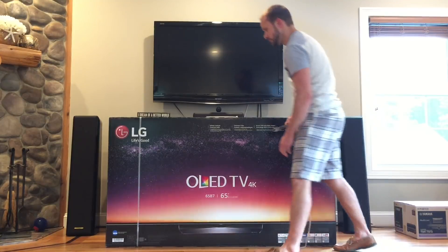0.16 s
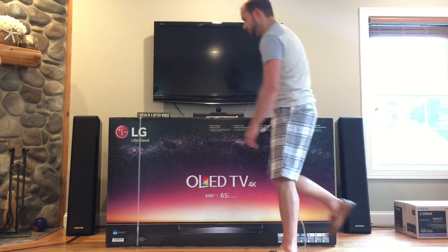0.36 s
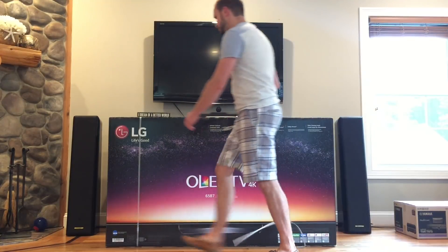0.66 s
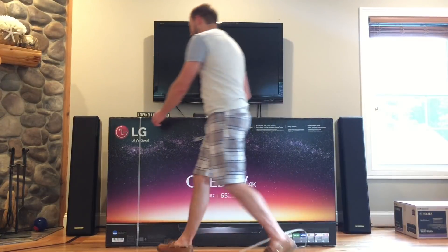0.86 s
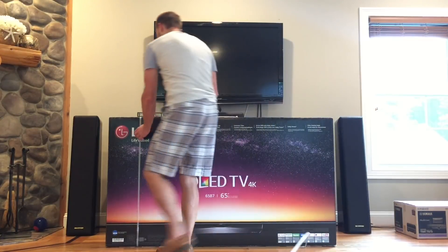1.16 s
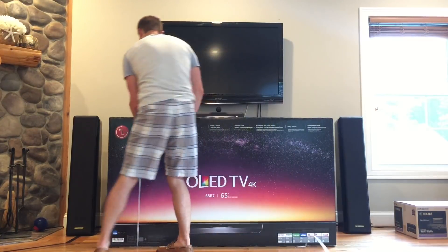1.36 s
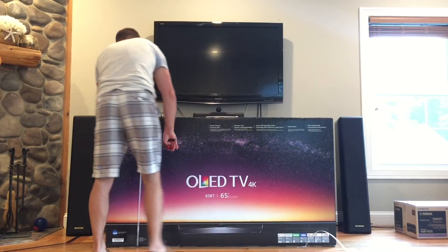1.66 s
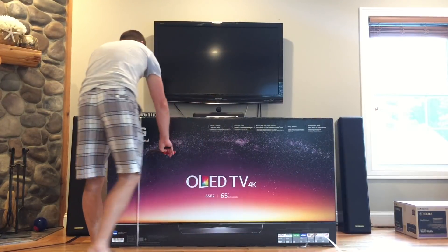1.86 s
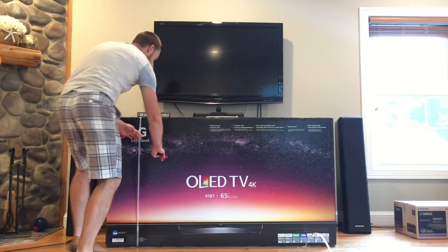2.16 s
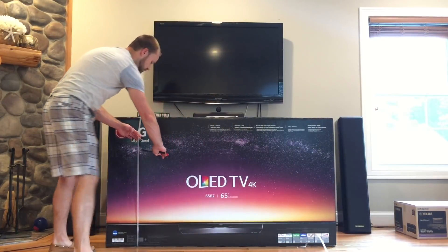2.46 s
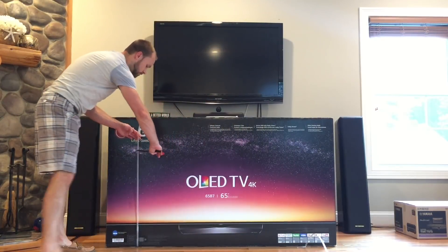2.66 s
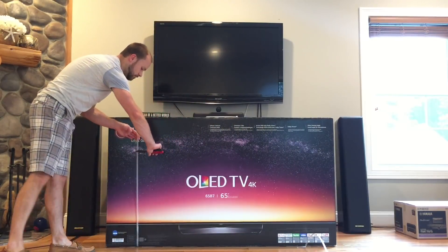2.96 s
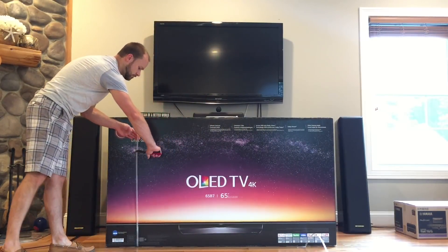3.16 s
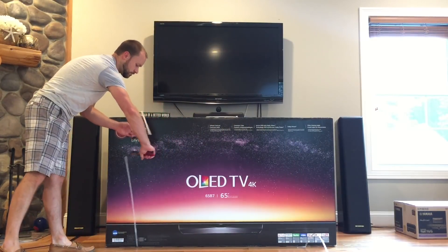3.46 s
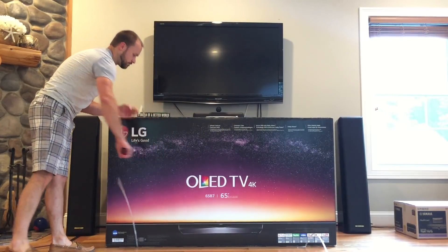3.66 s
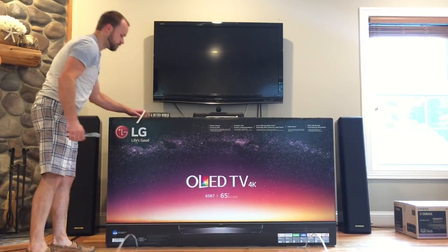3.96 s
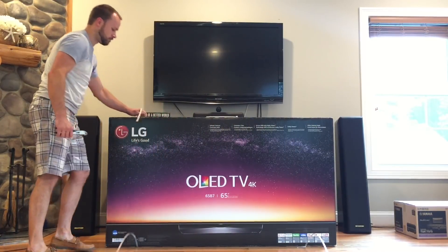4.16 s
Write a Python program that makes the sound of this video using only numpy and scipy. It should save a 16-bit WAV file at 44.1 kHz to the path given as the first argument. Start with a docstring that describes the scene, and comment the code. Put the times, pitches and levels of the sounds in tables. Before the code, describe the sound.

Someone shuffles around a cardboard box indoors, then cuts its plastic packing strap with small ticks and one sharp, thumping crack.

```python
"""Cutting the strap on a cardboard box

A living room with a wooden floor, the microphone close to a large box. Over quiet room tone a man
shuffles round it: soles thud, scuff and squeak, hands brush the cardboard, joists rumble under him.
Blades bite the plastic strap in small ticks; it snaps and slaps the box, and the room rings on."""
import sys
import numpy as np
from scipy import signal
from scipy.fft import rfft, irfft, next_fast_len
from scipy.io import wavfile
from scipy.ndimage import uniform_filter1d

SR = 44100
rng = np.random.default_rng(int(sys.argv[2]) if len(sys.argv) > 2 else 0)


def materialize(psi):
    """Save the field psi as 16-bit PCM at rate SR to the path in sys.argv[1].

    A 1-D psi becomes a single channel; in a 2-D psi each row is a channel.
    """
    bounded = np.clip(np.atleast_2d(psi).T, -1, 1)
    quanta = np.round(bounded * 32767).astype(np.int16)
    wavfile.write(sys.argv[1], SR, quanta)


N = 189982
TIME = np.arange(N) / SR


def amp(db):
    """dB to gain."""
    return 10 ** (np.asarray(db) / 20)


def unit(x):
    """Scaled to rms 1."""
    return x / np.sqrt(np.mean(x ** 2) + 1e-20)


def add(out, start_s, x):
    """Mixes x into out from start_s."""
    part = out[round(start_s * SR):][:len(x)]
    part += x[:len(part)]


def along(points, hz):
    """Interpolates (freq_hz, value) points on a log frequency axis."""
    freqs, values = np.transpose(points)
    return np.interp(np.log(hz + 1), np.log(freqs + 1), values)


def colour(spectrum):
    """Zero-phase response through (freq_hz, gain_db) points."""
    return lambda hz: amp(along(spectrum, hz))


def causal(spectrum):
    """Response through (freq_hz, gain_db) points that starts at once: minimum phase."""
    def response(hz):
        cepstrum = irfft(np.log(colour(spectrum)(hz)))
        half = len(cepstrum) // 2
        fold = np.r_[1, 2 * np.ones(half - 1), np.zeros(half)]
        return np.exp(rfft(cepstrum * fold))
    return response


def modes(table):
    """Causal response of (pitch_hz, width_hz, gain_db) resonances, alternating in sign."""
    return lambda f: sum((-1) ** k * amp(db) * 1j * f * width / (hz * hz - f * f + 1j * f * width)
                         for k, (hz, width, db) in enumerate(table))


def filtered(x, response):
    """x through a complex frequency response."""
    size = next_fast_len(x.shape[-1] + SR // 2)
    hz = np.fft.rfftfreq(size, 1 / SR)
    return irfft(rfft(x, size) * response(hz), size)[..., :x.shape[-1]]


def noise(response, patchy_db=0, grain_db=0):
    """Filtered noise of rms 1, with patches of random gain and fast grit."""
    spectra = signal.stft(rng.standard_normal(N + SR), nperseg=512)[2]
    patches = uniform_filter1d(rng.standard_normal(spectra.shape), 3, axis=0)
    patches = unit(uniform_filter1d(patches, 10, axis=1))
    patchy = signal.istft(spectra * amp(patchy_db * patches), nperseg=512)[1][:N]
    grit = unit(uniform_filter1d(rng.standard_normal(N), 60))
    return unit(filtered(patchy * amp(grain_db * grit), response))


# the quiet living room, all round the microphone: freq_hz, gain_db
TONE_SPECTRUM = [(15, -44), (25, -8), (124, 3), (330, -4), (496, -13), (669, -11), (831, -12.5),
                 (2330, -16), (9330, -24.5), (10400, -28), (13600, -27.5), (15200, -35), (16500, -51)]


def room_tone(level_db=-66.5):
    """Steady low noise under everything."""
    return amp(level_db) * noise(colour(TONE_SPECTRUM), patchy_db=1.0)


# joists under the floor: freq_hz, gain_db
JOIST_SPECTRUM = [(20, -28), (35, -8), (60, 5.5), (100, 0.5), (160, -43)]
# their rumble as he moves about: time_s, level_db
WEIGHT_SHIFTS = [(0, -84), (0.17, -76), (0.32, -60), (0.6, -74), (0.97, -65), (1.68, -69), (1.93, -89),
                 (2.29, -77), (2.44, -55), (2.63, -75), (2.77, -67), (2.89, -99), (2.99, -60.5), (3.3, -76),
                 (3.98, -81.5), (4.08, -56), (4.14, -56), (4.31, -91.5)]


def joist_rumble():
    """The joists rumble as his weight shifts."""
    weight = amp(np.interp(TIME, *np.transpose(WEIGHT_SHIFTS)))
    return weight * noise(colour(JOIST_SPECTRUM), patchy_db=1.2)


# soles, hands and loose strap, close by: start_s, rise_s, rasp_db, t60_s, body_re_db, sizzle_re_db
SCUFF_STROKES = [(0.12, 0.0014, -56.5, 0.36, -5, -4), (0.242, 0.0082, -61, 0.35, -5, -21),
                 (0.252, 0.087, -47, 0.43, -7.5, -39), (0.401, 0.017, -54.5, 0.17, 0.5, -6),
                 (.534, 0.0077, -57.5, 0.12, -10, -21), (.54, 0.062, -60.5, 0.068, 7, -31),
                 (0.614, 0.029, -49, 0.35, 3, -21), (.88, 0.037, -67.5, 0.26, 4, -10),
                 (1.006, .001, -56.5, 0.27, 4, -34), (1.041, 0.043, -63.5, 0.44, -12, -4.5),
                 (1.202, 0.001, -75.5, 0.21, 21.5, -7), (1.25, 0.016, -69, 1, 7, -1),
                 (1.38, 0.0079, -55, 0.31, 15.5, -3), (1.47, .002, -59.5, 0.14, 9, -19),
                 (1.561, 0.03, -56.5, 0.41, 4, -9), (1.592, 0.0012, -50.5, 0.29, 5.5, 1.5),
                 (2.029, .02, -69.5, 0.18, 6.5, -18), (2.15, 0.0098, -69, 0.76, 2.5, -7),
                 (2.351, 0.0011, -49.5, 0.03, -20, -11), (2.354, 0.0096, -54.5, 0.37, 4, -35),
                 (2.431, 0.0029, -56, 0.24, 11, -35), (2.657, .012, -66, 0.26, 8, -24),
                 (2.727, 0.0015, -61, .12, 2.5, -11), (2.74, 0.0081, -76, 0.54, 12, -12),
                 (2.856, 0.0049, -72.5, 0.13, -2, -14), (2.937, 0.0014, -64.5, 0.15, 1.5, -7),
                 (2.961, 0.013, -74.5, 0.2, 11.5, -11), (3.936, .008, -64, 0.31, 10.5, -25),
                 (4.073, .005, -64.5, 0.26, 5, -17), (4.1, 0.0086, -63.5, 0.15, 0, -6),
                 (4.16, 0.052, -74.5, 0.18, 3, -2)]
# hollow cardboard: pitch_hz, width_hz, gain_db
BODY_MODES = [(460, 200, -3), (680, 175, 0), (1020, 200, -2), (1184, 220, -4.5), (1555, 230, -8)]
# rasp of the rubbed surfaces: pitch_hz, width_hz, gain_db
RASP_MODES = [(1280, 250, -2), (2090, 300, 3), (2500, 540, 1.5), (3540, 970, -1.5), (4415, 1100, -3),
              (5870, 3100, -9), (7180, 700, -14)]
# fine hiss on top: freq_hz, gain_db
SIZZLE_SPECTRUM = [(5000, -20), (7500, -0.5), (10500, -5), (13000, -7), (15500, -6)]


def scuffs(swell_db=10, linger=1.07):
    """Rubbing swells and dies away: a rasp, with hollow body and sizzle set relative to it."""
    power, t = np.zeros((3, N)), np.arange(SR // 2) / SR
    for start_s, rise_s, rasp_db, t60_s, body_re_db, sizzle_re_db in SCUFF_STROKES:
        fall_db = -60 * (np.abs(t - rise_s) / t60_s) ** linger  # linger over 1 holds the peak
        shape_db = np.where(t < rise_s, swell_db * (t / rise_s - 1), fall_db)
        for layer, offset_db in zip(power, (body_re_db, 0, sizzle_re_db)):
            add(layer, start_s, amp(rasp_db + offset_db + shape_db) ** 2)
    body = noise(modes(BODY_MODES), patchy_db=5.4, grain_db=1.4)
    rasp = noise(modes(RASP_MODES), patchy_db=3.5, grain_db=1.4)
    sizzle = noise(colour(SIZZLE_SPECTRUM), patchy_db=0.37, grain_db=2.2)
    return np.sum(np.sqrt(power) * [body, rasp, sizzle], axis=0)


# the living room's ring, behind the close sounds: freq_hz, t60_s
ROOM_DECAY = [(100, 0.4), (400, 0.48), (1200, 0.55), (3000, 0.43), (7000, 0.45), (12000, 0.34),
              (15000, 0.21), (16500, 0.14)]


def room_tail(x):
    """A diffuse tail in which each frequency dies at its own speed."""
    hz, t, spectra = signal.stft(rng.standard_normal(SR), SR, nperseg=256)
    decay = amp(-60 * t / along(ROOM_DECAY, hz)[:, None])
    tail = signal.istft(spectra * decay, SR, nperseg=256)[1]
    onset = 1 - np.exp(-np.arange(len(tail)) / SR / 0.001)
    return signal.fftconvolve(x, tail / np.linalg.norm(tail) * onset)[:N]


# footfalls and bumps near the microphone: start_s, push_db, pitch_hz, rumble_re_db, knock_re_db
FOOTFALLS = [(0.14, -40, 169, -3.5, 7), (0.209, -46.5, 230, -21, 9.5), (0.328, -35.5, 257, -16, -17),
             (0.447, -43.5, 154.5, -5.5, -1.5), (0.615, -33.5, 458, -12.5, -6),
             (0.685, -44, 145, -4.5, 17.5), (0.88, -43.5, 248, -1, 4), (1.007, -35.5, 214, -3.5, 1.5),
             (1.204, -40.5, 145, 4, 16), (1.266, -50.5, 257, -1, -20), (1.318, -45.5, 333, -4.5, 4),
             (1.382, -37.5, 212, 8.5, 14), (1.391, -29, 259, -8.5, 1), (1.416, -26.5, 445, -13.5, -10),
             (1.449, -32.5, 460, -18, -5), (1.492, -38.5, 420, -3.5, -1), (1.57, -38.5, 193, 2, 7),
             (1.6, -45, 247, 3, 9), (2.162, -46.5, 333, -9.5, 8), (2.362, -40.5, 273, 3.5, 12),
             (2.431, -34, 243, -6.5, -17), (2.567, -39, 190, -4.5, 7.5), (2.668, -39, 263, -7.5, 8),
             (3.021, -35.5, 196, -3.5, -18), (3.143, -34, 170, -3, 4), (3.94, -45.5, 238.5, -1.5, -14),
             (4.076, -40, 160, -6, -5.5), (4.094, -41.5, 144, 4, -10)]
# floorboards: pitch_hz, width_hz, gain_db
FLOOR_MODES = [(320, 110, 6.5), (433, 250, -1.5), (705, 99, -2.5), (1000, 340, -11), (1460, 340, -15)]


def thuds(rumble_rise_s=0.029, rumble_hold_s=0.054, rumble_t60_s=0.35, knock_t60_s=0.079):
    """A soft push of about two cycles; a wooden knock and a short rumble are set relative to it."""
    out, knocks, t = np.zeros(N), np.zeros(N), np.arange(SR // 4) / SR
    rise = 1 - np.exp(-(t / rumble_rise_s) ** 2)
    swell = rise * amp(-60 * t / rumble_t60_s) / (1 + (t / rumble_hold_s) ** 8)
    for start_s, push_db, hz, rumble_re_db, knock_re_db in FOOTFALLS:
        cycles = t * hz - 1.25  # the sole takes about a cycle to settle
        push = np.exp(-(cycles / 0.87) ** 2) * np.cos(2 * np.pi * cycles)
        boards = modes([(hz, 1.3 * hz, 0), (1.6 * hz, 1.3 * hz, -2)])
        rumble = unit(filtered(rng.standard_normal(len(t)), lambda f: boards(f) ** 2))
        knock = amp(-60 * t / knock_t60_s) * rng.standard_normal(len(t))
        add(out, start_s, amp(push_db) * (push + amp(rumble_re_db) * swell * rumble))
        add(knocks, start_s + 0.003, amp(push_db + knock_re_db) * knock)
    return out + filtered(knocks, lambda f: modes(FLOOR_MODES)(f) ** 2)


# small hard contacts, close by: start_s, level_db, pitch_hz, t60_s
CONTACTS = [(0.245, -55, 5740, 0.22), (0.581, -58.5, 5880, 0.065), (.583, -53, 1980, 0.2),
            (0.636, -51.5, 4650, 0.095), (1.008, -61, 3450, 0.026), (1.022, -61, 4300, 0.12),
            (1.191, -67, 4650, .2), (1.386, -41, 950, 0.29), (1.491, -51, 487, 0.44),
            (2.36, -45, 3370, 0.036), (2.433, -70, 3620, 0.025), (2.727, -57, 8800, 0.026),
            (2.861, -65, 4170, 0.036), (2.938, -60, 3710, 0.027), (3.934, -52, 2090, 0.066),
            (3.954, -53.5, 1503, 0.18), (4.108, -55, 5600, 0.052)]


def ticks(click_t60_s=0.0022):
    """Each contact clicks and leaves a rough ring: narrow noise dying away."""
    out, t = np.zeros(N), np.arange(SR // 5) / SR
    for start_s, level_db, hz, t60_s in CONTACTS:
        ring = unit(filtered(rng.standard_normal(len(t)), modes([(hz, 0.048 * hz, 0)])))
        click = amp(-60 * t / click_t60_s) * rng.standard_normal(len(t))
        add(out, start_s, amp(level_db) * (amp(-60 * t / t60_s) * ring + 0.57 * click))
    return out


def sole_squeak(start_s=0.534, length_s=0.043, pitch_hz=1975, level_db=-56):
    """A sole sticks and sings a short, slightly unsteady tone."""
    out, t = np.zeros(N), np.arange(round(length_s * SR)) / SR
    drift = 0.5 * unit(uniform_filter1d(rng.standard_normal(len(t)), size=300))
    arch = np.abs(np.sin(np.pi * t / length_s)) ** 0.3
    add(out, start_s, amp(level_db) * arch * np.sin(2 * np.pi * pitch_hz * t + drift))
    return out


def strap_bursts(rows, room_db):
    """Two tracks: noise bursts that swell and break off up close, and one click each for the room."""
    bursts, clicks = np.zeros((2, N))
    for time_s, level_db, length_s in rows:
        age = np.arange(SR // 50) / SR / length_s
        burst = age * np.exp(1 - age ** 2) * rng.standard_normal(len(age))
        add(bursts, time_s - length_s / 2, amp(level_db) * burst)
        clicks[round(time_s * SR)] = amp(level_db + room_db) * np.sqrt(length_s * SR)
    return np.array([bursts, clicks])


# blades biting the strap, close to the microphone: time_s, level_db, length_s
BLADE_BITES = [(3.2779, -41, 0.0006), (3.301, -48, 0.0014), (3.3265, -33, 0.0015), (3.3582, -31.5, 0.0014),
               (3.362, -34, .001), (3.3668, -23, 0.0022), (3.377, -30.5, 0.006)]
# a small tear is thinner than the snap: freq_hz, gain_db
BITE_SPECTRUM = [(1200, -7), (2600, -0.5), (5000, -3), (9000, -0.5), (14500, 6.5)]
# the loose end striking the box: time_s, level_db
STRAP_SLAPS = [(3.446, -13), (3.4507, -14)]
# a flat slap is duller than the snap: freq_hz, gain_db
SLAP_SPECTRUM = [(1500, 0.5), (3000, 1.5), (6000, -3.5), (15000, -10.5)]
# what the plastic strap radiates: freq_hz, gain_db
STRAP_SPECTRUM = [(600, -29), (1400, -7.5), (2000, -10.5), (2550, 2.5), (3100, -9.5), (3850, -6.5),
                  (4800, -13), (6700, -9), (8500, -11), (10500, -10.5), (12000, -11.5), (13800, -7.5),
                  (15400, -10.5), (17000, -21)]


def strap_cut(snap_s, snap_db=-2.7, snap_length_s=0.0018):
    """Each bite tears the strap a little; the last tear frees it and the loose end slaps the box."""
    bites = filtered(strap_bursts(BLADE_BITES, room_db=0), causal(BITE_SPECTRUM))
    slap_rows = [(time_s, level_db, 0.001) for time_s, level_db in STRAP_SLAPS]
    slaps = filtered(strap_bursts(slap_rows, room_db=-1.5), causal(SLAP_SPECTRUM))
    snap = strap_bursts([(snap_s, snap_db, snap_length_s)], room_db=-1.5)
    snap[0, round((snap_s + 0.0008) * SR)] += amp(15)  # the last fibres part at once
    crack, clicks = filtered(bites + slaps + snap, causal(STRAP_SPECTRUM))
    return crack + amp(-2) * early_echoes(crack) + room_tail(clicks)


# floor and near walls, as they reach the microphone: delay_s, gain_db
REFLECTIONS = [(.0062, -10), (.0093, -8.5), (0.0147, -13.5), (.021, -17)]


def early_echoes(x):
    """Delayed, weaker copies off the nearest surfaces."""
    return sum(amp(db) * np.pad(x, (round(delay_s * SR), 0))[:N] for delay_s, db in REFLECTIONS)


# the large cardboard box, close up: pitch_hz, width_hz, gain_db
BOX_MODES = [(67, 66, -11), (127, 55, -4.5), (260, 55, -0.5), (339, 50, 1.5), (408, 55, 0.5),
             (630, 180, -0.5), (980, 130, -1), (1360, 530, -10)]


def box_thump(snap_s, blow_s=0.00028):
    """The strap's hard recoil thumps the box, which sets the room ringing."""
    blow, age = np.zeros(N), np.arange(200) / SR / blow_s
    add(blow, snap_s + 0.0012, amp(11.5) * (1 - age) * np.exp(-age))
    add(blow, snap_s + 0.0015, amp(5.5) * age * np.exp(-age))
    thump = filtered(blow, modes(BOX_MODES))
    return thump + early_echoes(thump) + amp(1) * room_tail(thump)


def scene():
    """One microphone by the box: the cut rings the room; steps and scuffs stay close."""
    snap_s = 3.3908
    cut = strap_cut(snap_s) + box_thump(snap_s)
    steps = thuds() + scuffs() + ticks() + sole_squeak()
    return (cut + steps + amp(-12) * room_tail(steps) + room_tone() + joist_rumble())[None]


# the level, dipping briefly near the end: time_s, gain_db
LEVEL_DIP = [(0, -1.5), (4.24, -1), (4.272, -8), (4.282, -28), (4.29, 3), (4.305, -6)]
# the highest treble falls away steeply above about 16 kHz: freq_hz, gain_db
TOP_CUT = [(15850, 0.5), (16100, -24.5)]


def record(dry, ceiling=0.8, top_hz=16750):
    """The input stage rounds off the highest peak, the level dips briefly, the top treble falls away."""
    rounded = dry / (1 + np.abs(dry / ceiling) ** 4) ** 0.25
    dipped = rounded * amp(np.interp(TIME, *np.transpose(LEVEL_DIP)))
    return filtered(dipped, lambda hz: colour(TOP_CUT)(hz) * (hz < top_hz))


dry = scene()
out = record(dry)
materialize(out)
```